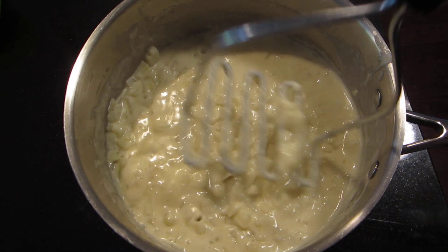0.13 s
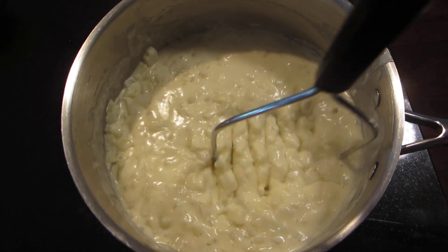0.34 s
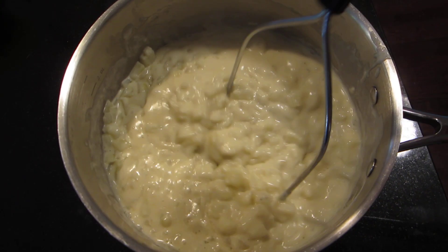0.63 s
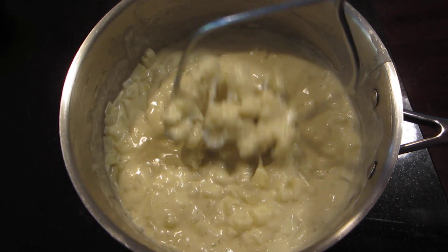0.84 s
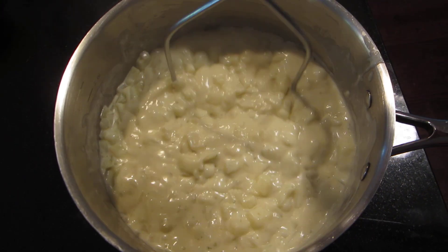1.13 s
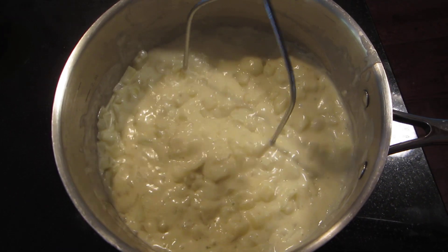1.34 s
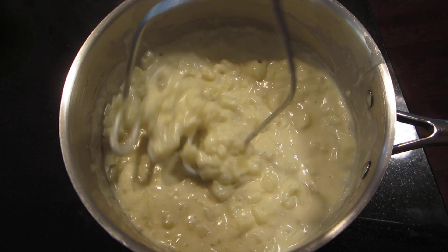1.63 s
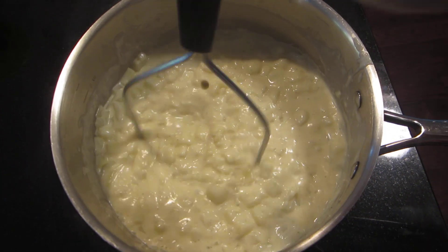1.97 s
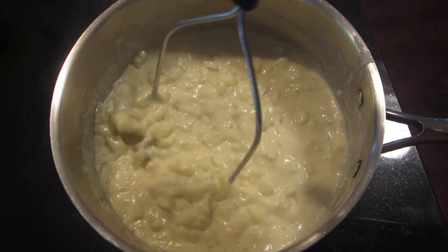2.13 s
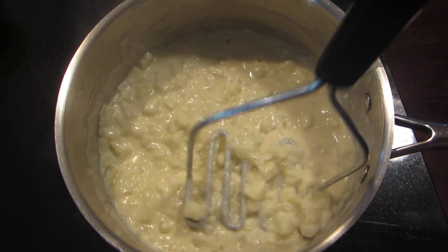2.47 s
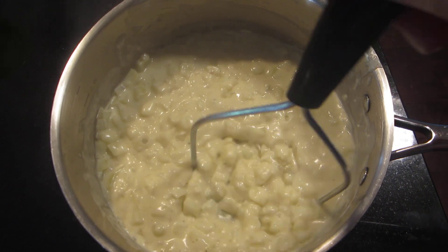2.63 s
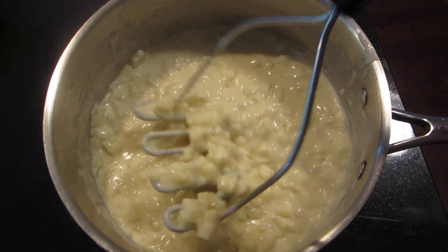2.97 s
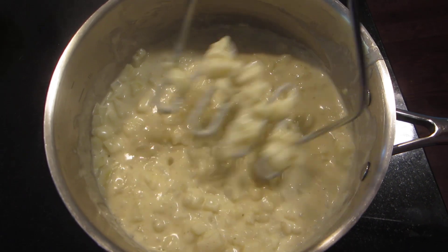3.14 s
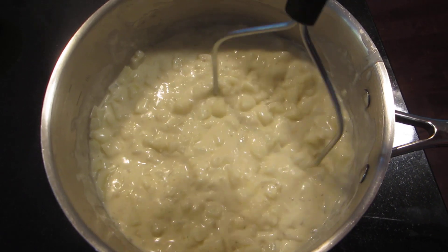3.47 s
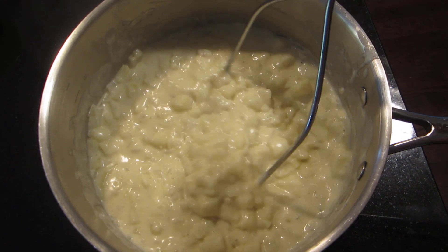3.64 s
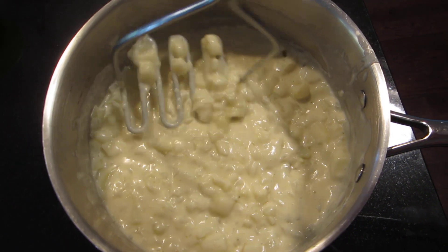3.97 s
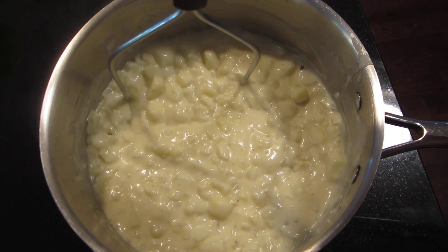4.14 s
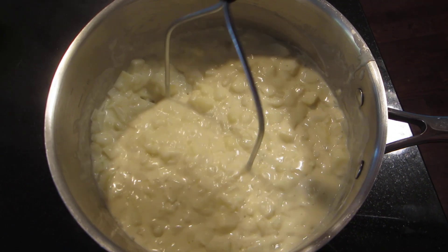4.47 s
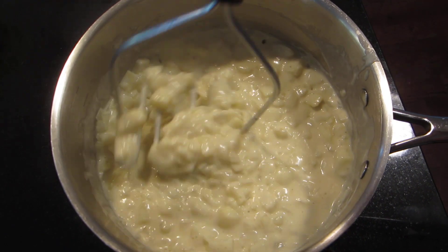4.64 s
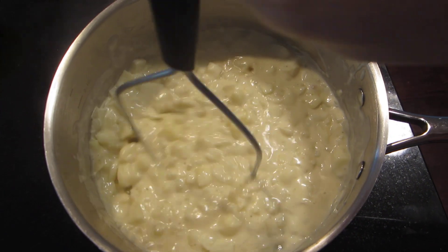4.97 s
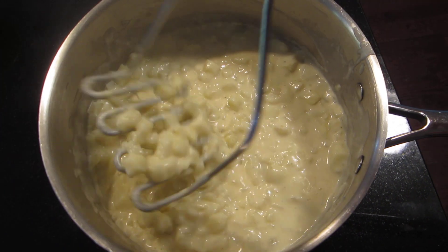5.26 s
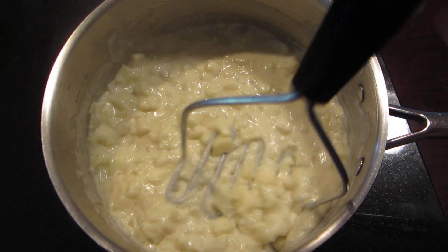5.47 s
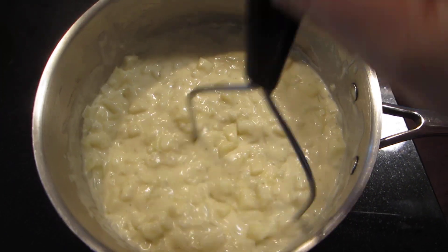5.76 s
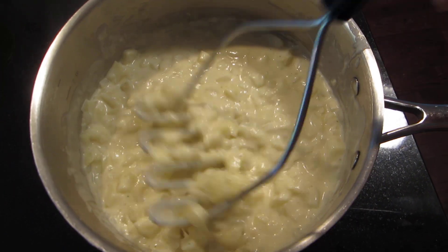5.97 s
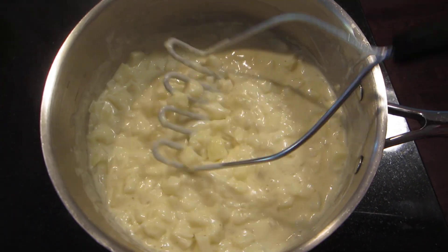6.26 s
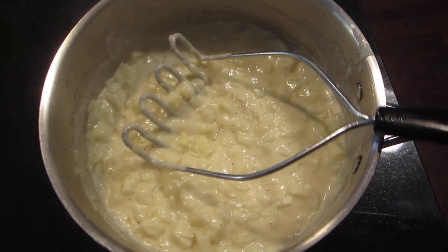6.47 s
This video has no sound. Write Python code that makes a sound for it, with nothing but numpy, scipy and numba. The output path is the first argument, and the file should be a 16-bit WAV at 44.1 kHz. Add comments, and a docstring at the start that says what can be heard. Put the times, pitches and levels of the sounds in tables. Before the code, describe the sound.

Irregular mashing heard from just over the pan rim: sharp wire-on-steel clanks, quick rasping drags, and clattering lighter contacts, with damp mash popping and plopping between. The pan rings briefly, squeaks once, and bumps the hob late on. Steady low hum and faint hiss lie underneath, dipping slightly after loud knocks and creeping back. The room is small, with little echo.

```python
"""Just above the rim of a steel saucepan, a wire masher is heard working thick potato soup.
The wire knocks and scrapes the steel: decaying modes ring under bursts and strokes of shaped noise.
The mash plops and ticks in short damped sines, the pan bumps the hob, and the wire squeaks once.
An appliance hums in steady lines over shaped noise for room air and microphone hiss.
The recorder turns its gain down on loud knocks and lets it creep back."""
import sys
import numpy as np
from scipy import signal
from scipy.fft import rfft, irfft
from scipy.io import wavfile
from scipy.ndimage import uniform_filter1d, map_coordinates
from numba import njit

SR = 44100
rng = np.random.default_rng(int(sys.argv[2]) if len(sys.argv) > 2 else 0)


def dump_mix(stems):
    """Bounce the given channels to the path in sys.argv[1] as a 16-bit WAV at rate SR."""
    frames = np.atleast_2d(stems).T  # one column per channel
    limited = np.clip(frames, -1, 1)  # hard clip at full scale
    pcm = np.round(limited * 32767).astype(np.int16)
    wavfile.write(sys.argv[1], SR, pcm)


def voltage_ratio(level):
    """Linear amplitude factor for a level in decibels (scalar or array-like)."""
    return 10 ** (np.asarray(level, float) / 20)


N = 291501
T = np.arange(N) / SR

# Hum lines of an appliance. Each row: frequency in Hz, level in dB.
HUM_LINES = [(59.3, -65.5), (118.6, -72.5), (237.2, -54), (296.5, -61.5), (415.1, -79), (1127, -67)]
# Spectrum of room air and microphone hiss. Each row: frequency in Hz, relative level in dB.
AIR_SPECTRUM = [(20, 0.5), (53, -7), (177, -1.5), (347, -6.5), (738, -1.5), (1200, -9), (1600, -15.5),
                (2050, -14.5), (2600, -21.5), (8890, -25.5), (12800, -30), (16000, -34)]
AIR_DB = -53
# Clear bubbles bursting on the mash. Each row: start in seconds, level in dB, frequency in Hz.
BUBBLES = [(.107, -29, 4250), (.179, -29.5, 5000), (.787, -34.5, 2450), (.821, -28.5, 5900),
           (.879, -37.5, 5800), (.979, -25, 6900), (1.044, -35, 3670), (1.414, -28, 4270),
           (1.451, -28.5, 3550), (1.484, -27.5, 4160), (1.601, -28, 9100), (1.619, -31, 4450),
           (1.634, -29, 5800), (1.649, -25.5, 8900), (1.666, -25.5, 7000), (1.682, -33.5, 2500),
           (1.848, -30, 5740), (2.067, -19.5, 6480), (2.161, -26, 9700), (2.24, -35.5, 2750),
           (2.311, -26.5, 5600), (2.34, -36, 5300), (2.357, -31, 4800), (2.653, -19.5, 2860),
           (2.96, -34, 4800), (3.051, -29.5, 4460), (3.109, -34.5, 3600), (3.678, -28, 10230),
           (3.735, -31.5, 2900), (3.763, -31, 11400), (3.782, -28.5, 5000), (3.918, -29.5, 7200),
           (4.453, -29.5, 3870), (4.55, -24, 6260), (4.721, -26.5, 3033), (4.74, -30, 3600),
           (5.323, -34.5, 2310), (5.397, -35, 6500), (5.516, -20.5, 3100), (5.677, -37, 2130)]
# Wire dragged over steel. Each row: start in seconds, loudest moment in seconds, end of the main
# stroke in seconds, level in dB, base level relative to the wire in dB (high when deep in the pan).
STROKES = [(0.19, 0.213, 0.35, -37.5, -3), (0.336, 0.338, 0.71, -49.5, -1.5),
           (0.46, 0.487, 0.5, -35.5, -25.5), (0.51, 0.528, 0.7, -49, 3), (0.542, 0.566, 0.59, -42.5, -9.5),
           (0.965, 0.984, 1.07, -57, 1.5), (1.148, 1.192, 1.205, -35, -14.5), (1.201, 1.205, 1.245, -40, 9),
           (1.225, 1.257, 1.285, -29, -7), (1.268, 1.272, 1.53, -44, -1), (1.775, 1.79, 1.9, -59, 13),
           (1.865, 1.931, 1.96, -46, -1), (1.94, 1.971, 1.99, -35, -1), (1.986, 1.99, 2.15, -45, -1),
           (2.075, 2.089, 2.1, -49.5, -12), (2.442, 2.453, 2.71, -33, -5), (2.625, 2.635, 2.7, -37, -13),
           (2.708, 2.72, 2.78, -48.5, 5), (2.769, 2.77, 2.92, -44, -16), (2.811, 2.84, 2.91, -41.5, -6),
           (3.208, 3.227, 3.45, -36.5, -4), (3.429, 3.467, 3.5, -38, -9), (3.512, 3.545, 3.66, -48, -7.5),
           (3.58, 3.592, 3.67, -45, 8), (4.036, 4.04, 4.24, -47, -7), (4.117, 4.145, 4.17, -49, -6),
           (4.191, 4.283, 4.335, -38, -13), (4.288, 4.298, 4.302, -21, -24), (4.334, 4.338, 4.57, -41.5, 0),
           (4.708, 4.747, 4.8, -50, -4), (4.787, 4.806, 4.86, -54, 5), (4.905, 4.945, 4.975, -40, -16),
           (4.948, 4.953, 5.0, -47, 9), (5.0, 5.013, 5.036, -51, 8), (5.452, 5.46, 5.68, -38, -3),
           (5.576, 5.586, 5.598, -20.5, -24), (5.722, 5.75, 5.9, -44, 9), (5.815, 5.855, 5.89, -39, -20),
           (6.262, 6.278, 6.43, -39.5, -4), (6.333, 6.347, 6.43, -44, -4), (6.527, 6.539, 6.65, -51.5, 7)]
# Spectrum of the wire's rasp. Each row: frequency in Hz, relative level in dB.
RASP_SPECTRUM = [(2500, -41.5), (4500, 1), (8000, 2), (11000, -19), (16000, -25)]
# Spectrum of the thinnest wire contact. Each row: frequency in Hz, relative level in dB.
SHEEN_SPECTRUM = [(6000, -14.5), (10000, -5), (13000, -17), (16000, -26.5)]
# Spectrum of the dense wall modes. Each row: frequency in Hz, relative level in dB.
WALL_SPECTRUM = [(700, -49), (1170, -4), (1550, -22), (2010, 4), (2500, -9), (3100, 4), (3800, -10),
                 (6000, -29.5)]
# Wire meeting steel. Each row: start in seconds, level in dB, treble relative to that level in dB,
# pan ring relative to that level in dB.
KNOCKS = [(0.195, -5, -6, -21), (0.3409, -9.5, 0.5, -70), (0.5187, -19.5, -5, -13),
          (0.5364, -19, -1.5, -12.5), (0.945, -41.5, -18, -12), (0.952, -32.5, -12.5, -5.5),
          (0.9614, -34.5, -3, -26), (0.97, -36, -3, -35), (0.9922, -31, 2, -17), (0.998, -38, -10, -25),
          (1.1441, -22.5, -5, -13), (1.2038, -20.5, -10, -12.5), (1.2618, -13, -7.5, -40),
          (1.695, -45, -12, 6.5), (1.7675, -24, -2, -11), (1.803, -51, -16, 11.5),
          (1.9697, -20, -14.5, -23), (1.9867, -16.5, -5.5, -18), (2.036, -26, 7, -43),
          (2.4276, -3, -2, -10.5), (2.543, -17, -9, -15), (2.7138, -16.5, -8.5, -7),
          (2.723, -31, -2.5, -24), (2.757, -40.5, -14, 11), (2.7738, -25, -3, -11),
          (2.901, -19.5, 0, -42.5), (3.2077, -3.5, -5, -12.5), (3.3482, -21, -0.5, -14.5),
          (3.4602, -24, -13.5, -9), (3.5125, -12.5, -2.5, -20), (3.586, -23, -13, -2.5),
          (3.5987, -30, -5, -12), (3.9918, -30.5, -11.5, -22), (4.036, -20, -1.5, -19.5),
          (4.1095, -34.5, 3, -11), (4.334, -8.5, -2, -27), (4.3418, -10, -3, -18), (4.468, -28.5, -14, -48),
          (4.788, -15, -2, -16.5), (4.806, -42, -17, 7), (4.834, -38, -13, 4.5), (4.849, -44.5, -10, 8),
          (4.95, -28, -9, -3.5), (5.4278, -29, -11.5, -46), (5.448, -8, -2.5, -17.5),
          (5.5658, -23, -7, -18), (5.7253, -30, -14, 7.5), (5.7371, -15, -11.5, -8.5),
          (5.7772, -17, -1.5, -17), (5.7848, -20.5, -10, -2), (6.2574, -10.5, 0.5, -16),
          (6.3524, -23, -4.5, -24), (6.5234, -33, -3.5, -1), (6.5306, -26.5, 0.5, -0.5)]
# Saucepan modes left to ring. Each row: frequency in Hz, level in dB, 60 dB decay time in seconds.
PAN_MODES = [(676, -26.5, 0.64), (750, -9.5, 0.49), (810, -13.5, 0.12), (952, -13, 0.34), (1079, -10, 0.1),
             (1119, -7, 0.31), (1212, -10.5, 0.34), (1380, -7, 0.16), (1550, -15.5, 0.33),
             (1873, -23.5, 0.46), (2077, 5, 0.2), (2583, -7.5, 0.14), (2860, -18.5, 0.069),
             (3090, -16.5, 0.15), (3340, -11.5, 0.12), (3590, -13, 0.26), (3826, -13, 0.23),
             (4050, -14, 0.073), (4600, -13, 0.24), (5140, -1.5, 0.1), (5750, -22.5, 0.12),
             (6500, -14, 0.19), (7130, -10.5, 0.12), (8080, -4, 0.15), (10400, -7.5, 0.036)]
# Spectrum of the knock's burst. Each row: frequency in Hz, relative level in dB.
CRACK_SPECTRUM = [(180, -58.5), (300, -22.5), (701, -9), (1320, -12.5), (1930, 1), (5250, 5), (8790, 1.5),
                  (9880, -1.5), (11300, -4), (13500, -10), (16000, -23.5)]
# Dull plops of pan base and mash. Each row: start in seconds, level in dB, starting frequency in Hz,
# 60 dB decay time in seconds.
PLOPS = [(0.29, -33.5, 596, 0.18), (0.59, -25, 725, 0.037), (1.078, -33, 705, 0.082),
         (1.333, -26, 758, 0.065), (1.85, -33.5, 744, 0.035), (1.694, -30.5, 707, 0.13),
         (1.804, -26, 1105, 0.026), (2.714, -12, 1120, 0.027), (2.823, -23, 647, 0.05),
         (3.532, -24.5, 638, 0.054), (3.556, -31, 714, 0.047), (3.586, -22.5, 753, 0.25),
         (3.598, -19.5, 737, 0.044), (4.212, -34, 575, 0.043), (4.75, -33, 723, 0.22),
         (5.176, -39, 700, 0.056), (5.514, -22, 676, 0.046), (5.724, -12.5, 584, 0.031),
         (5.74, 2.5, 723, 0.023), (5.754, -17, 684, 0.16), (5.792, -15.5, 701, 0.079),
         (6.522, -29.5, 658, 0.17)]
# The pan rocking on the hob. Each row: start in seconds, level in dB, frequency in Hz.
BUMPS = [(2.76, -40.5, 41), (5.765, -36, 40), (5.74, -26.5, 140), (2.714, -35.5, 137)]

# stroke level at its start; its fall from the loudest moment to the end
CATCH_DB, EASE_DB, EASE_DB_PER_S = -14, -10.5, -54.5
# a stroke trails away for a share of the time it spent easing off
TRAIL_SHARE, TRAIL_DB = 0.7, -14
# the wall sounds part of the way between wire and base, more so as a stroke gathers speed
WALL_DB, WALL_SHARE, WALL_SWELL_DB = -0.5, 0.75, 2
# a stroke that gathers speed is brighter than one that skids to rest
SHEEN_DB, SHEEN_SWELL_DB = 1, 17
# harder knocks bounce off and let the steel ring; softer ones stay pressed
BOUNCE_DB = -8.5
BASE_TOP_HZ, WALL_TOP_HZ = 1000, 4300
PRESSED_PITCH, PRESSED_DECAY = 0.975, 0.18  # ratios to the free mode
# the steel has close modes beyond counting; the moving wire wakes a few, then others
MOTTLE_HZ, MOTTLE_S, MOTTLE_DB = 150, 0.07, 5


def colour(x, points):
    """Linear filtering: a spectrum given in Hz and dB multiplies that of the sound."""
    hz, db = np.transpose(points)
    f = np.maximum(np.arange(len(x) // 2 + 1) * SR / len(x), 1)
    gain = voltage_ratio(np.interp(np.log(f), np.log(hz), db))
    return irfft(rfft(x) * gain, len(x))


def unit(x):
    """Normalisation: scales a signal to an rms of 1."""
    return x / np.sqrt(np.mean(x ** 2))


def ring(x, hz, t60):
    """Damped resonator: an impulse of 1 rings one mode with a starting amplitude of 1."""
    pole = np.exp((2j * np.pi * hz - np.log(1000) / t60) / SR)
    return signal.lfilter([1], [1, -pole], x).imag


def walk(rate):
    """Slow random modulation: normal levels drawn rate times a second, joined by ramps."""
    k = int(SR / rate)
    held = np.repeat(rng.standard_normal(N // k + 1), k)
    return uniform_filter1d(held, k)[:N]


def mottle(x):
    """Fluctuating modal excitation: narrow bands swell and fade at random, each briefly."""
    hz, s, z = signal.stft(x, SR, nperseg=512)
    chance = rng.standard_normal((128, 512))
    place = np.meshgrid(hz / MOTTLE_HZ, s / MOTTLE_S, indexing="ij")
    db = MOTTLE_DB * map_coordinates(chance, place, order=1, mode="mirror")
    return signal.istft(z * voltage_ratio(db), SR, nperseg=512)[1][:N]


def kitchen():
    """Superposition: hum lines that waver a little over room air and microphone hiss."""
    hum = 0
    for hz, db in HUM_LINES:
        hum = hum + voltage_ratio(db + 3 + 1.2 * walk(3)) * np.sin(2 * np.pi * hz * T + hz)
    return hum + voltage_ratio(AIR_DB) * unit(colour(rng.standard_normal(N), AIR_SPECTRUM))


def fizz(rate=170, db=-52, spread_db=15):
    """Heavily damped oscillation: each bursting bubble sounds a cycle or two, most of them faintly."""
    out = np.zeros(N + 256)
    t = np.arange(256) / SR
    chance = rng.random((int(rate * N / SR), 3))
    start = chance[:, 0] * N / SR
    level_db = db + spread_db * chance[:, 1] ** 3
    pitch_hz = 2500 * 5.5 ** chance[:, 2]
    faint = np.transpose([start, level_db, pitch_hz])
    for s, bubble_db, hz in np.vstack([BUBBLES, faint]):
        i = int(s * SR)
        out[i:i + 256] += voltage_ratio(bubble_db + 4.5) * np.sin(2 * np.pi * hz * t) * np.exp(-t * hz / 0.98)
    return out[:N]


def grit():
    """Rough friction: noise whose strength jumps as the wire catches on scratches, in patches."""
    catches_db = 3.6 * walk(350)
    patches_db = 1.8 * walk(45)
    return unit(rng.standard_normal(N) * voltage_ratio(catches_db + patches_db))


def drag(db):
    """Contact pressure: each stroke catches, swells to its loudest, eases off and lets go."""
    out = np.zeros(N)
    for (start, top, end, *_), level_db in zip(STROKES, db):
        gone = end + TRAIL_SHARE * (end - top) + 0.001
        i, j = int(start * SR), int(gone * SR)
        last_db = EASE_DB + EASE_DB_PER_S * (end - top)
        levels = [CATCH_DB, 0, last_db, last_db + TRAIL_DB]
        out[i:j] += voltage_ratio(level_db + np.interp(T[i:j], [start, top, end, gone], levels))
    # the contact lets go over a few milliseconds
    ease = np.exp(-1 / (0.00076 * SR))
    return signal.lfilter([1 - ease], [1, -ease], out)


def strokes():
    """Friction as a source: separate rough noises for wire, wall, base and thinnest contact."""
    start, top, end, db, deep_db = np.transpose(STROKES)
    swell = (top - start) / (end - start)  # share of the stroke spent gathering speed
    wall_db = db + WALL_DB + WALL_SHARE * deep_db + WALL_SWELL_DB * swell
    sheen_db = db + SHEEN_DB + SHEEN_SWELL_DB * swell
    return [grit() * drag(d) for d in (db, wall_db, db + deep_db, sheen_db)]


def scrape(rasp, wall, sheen):
    """High modal density: closely packed modes turn the strokes into mottled, coloured noise."""
    wire = voltage_ratio(4.5) * colour(rasp, RASP_SPECTRUM) + colour(sheen, SHEEN_SPECTRUM)
    return mottle(wire + voltage_ratio(10) * colour(wall, WALL_SPECTRUM))


def saucepan(rasp, wall, base):
    """Modal superposition: each knock strikes the modes in its own mix; scraping keeps them singing."""
    s, knock_db, treble_db, ring_db = np.transpose(KNOCKS)
    at = (s * SR).astype(int)
    spot = rng.standard_normal((len(s), len(PAN_MODES)))
    free = np.zeros(N)
    free[at] = knock_db > BOUNCE_DB
    wall_hz, wall_gain_db = np.transpose(WALL_SPECTRUM)
    out = np.zeros(N)
    for k, (hz, db, t60) in enumerate(PAN_MODES):
        zone = int(hz > BASE_TOP_HZ) + int(hz > WALL_TOP_HZ)  # 0 base, 1 wall, 2 treble
        share_db = treble_db - 10 if zone == 2 else ring_db
        blows = np.zeros(N)
        blows[at] = voltage_ratio(knock_db + share_db + 4 * spot[:, k])
        blows *= voltage_ratio(db - 5)
        out += ring(blows * free, hz, t60)
        # the pressing wire damps the steel, and feeds each mode more or less as it travels
        held_hz, held_t60 = hz * PRESSED_PITCH, t60 * PRESSED_DECAY
        wall_db = np.interp(np.log(held_hz), np.log(wall_hz), wall_gain_db)
        rub_db = (0.2 * db - 15, wall_db - 4, 0.2 * db - 13)[zone]
        rub = (base, wall, rasp)[zone] * voltage_ratio(rub_db + 3.5 * walk(12))
        rub /= np.sqrt(held_t60 * SR / (4 * np.log(1000)))  # offsets the build-up of a longer ring
        pressed = voltage_ratio(5.5) * blows * (1 - free)
        out += ring(rub + pressed, held_hz, held_t60)
    return out


def cracks():
    """Impact: each contact wakes many short high modes, heard as a bright, dying noise."""
    high, low = np.zeros(N), np.zeros(N)
    t_ms = np.arange(4096) / SR * 1000
    chance = unit(mottle(rng.standard_normal(N)))[:len(KNOCKS) * 4096].reshape(-1, 4096)
    for (s, knock_db, treble_db, _), noise in zip(KNOCKS, chance):
        i = int(s * SR)
        decay_ms = 0.46 * (2 - 0.51 * treble_db)  # duller knocks linger
        fade = np.exp(-t_ms / max(decay_ms, 0.1))
        fade += 0.24 * np.exp(-t_ms / max(4.5 * decay_ms, 0.1))
        burst = (noise * fade * np.minimum(t_ms / 0.3, 1))[:N - i]
        low[i:i + len(burst)] += voltage_ratio(knock_db) * burst
        high[i:i + len(burst)] += voltage_ratio(knock_db + treble_db) * burst
    body = signal.sosfilt(signal.butter(2, [1100, 4500], "band", fs=SR, output="sos"), low)
    edge = signal.sosfilt(signal.butter(2, 4500, "high", fs=SR, output="sos"), high)
    return colour(voltage_ratio(5) * body + voltage_ratio(11) * edge, CRACK_SPECTRUM)


def plops():
    """Damped oscillation: soft wet blows give a few rising cycles with a splatter of noise around."""
    out = np.zeros(N)
    t = np.arange(8192) / SR
    chance = rng.standard_normal((len(PLOPS), 8192))
    for (s, db, hz, t60), noise in zip(PLOPS, chance):
        i = int(s * SR)
        tone = np.sin(2 * np.pi * hz * t * (1 + 0.55 * t))
        splatter = 0.7 * unit(ring(noise, 1.125 * hz, 0.0043))
        fade = np.exp(-np.log(1000) * t / t60) * (1 - np.exp(-t / 0.001))
        out[i:i + len(t)] += voltage_ratio(db) * ((tone + splatter) * fade)[:N - i]
    return out


def bumps():
    """Structure-borne sound: the rocking pan sends low damped thumps through the hob."""
    out = 0
    for s, db, hz in BUMPS:
        t = np.maximum(T - s, 0)
        out = out + voltage_ratio(db) * np.sin(2 * np.pi * hz * t) * np.exp(-t * hz / 2)
    return out


def squeak():
    """Stick-slip in step with the base mode: an uneven tone swells, rises a little and breaks off."""
    peak_s, peak_hz, glide_hz_per_s = 4.757, 735, 150
    swell_db_per_s, stop_db_per_s = 380, 2500
    t = np.clip(T - peak_s, -0.1, 0.1)
    phase = 2 * np.pi * np.cumsum(peak_hz + glide_hz_per_s * np.minimum(t, 0)) / SR
    tone = np.sin(phase)
    tone += 0.12 * np.sin(2 * phase) + 0.03 * np.sin(4 * phase) + 0.04 * np.sin(6 * phase)
    db = np.minimum(swell_db_per_s * t, -stop_db_per_s * t) + 2.5 * walk(120)
    return tone * voltage_ratio(-25 + db) * (abs(t) < 0.1)


def room(x, t60=0.7, db=-25):
    """Reverberation: pan interior and walls add a short, diffuse, decaying tail."""
    t = np.arange(int(0.5 * SR)) / SR
    tail = signal.lfilter([1], [1, -0.4], rng.standard_normal(len(t))) * np.exp(-np.log(1000) * t / t60)
    return x + voltage_ratio(db) * signal.fftconvolve(x, tail / np.sqrt(np.sum(tail ** 2)))[:N]


def scene():
    """Superposition at the microphone of all sources, the near ones with the room's tail."""
    rasp, wall, base, sheen = strokes()
    steel = scrape(rasp, wall, sheen) + saucepan(rasp, wall, base) + cracks()
    near = fizz() + steel + plops() + squeak()
    # the near sounds carry nothing below about 430 Hz
    near = signal.sosfilt(signal.butter(4, 430, "high", fs=SR, output="sos"), near)
    return (room(near) + bumps() + kitchen())[None]


@njit
def ride(x, top, power, attack, release):
    """Gain control: an envelope follows the peaks, so gain drops fast and recovers slowly."""
    y, envelope = np.empty(len(x)), 0.
    for i in range(len(x)):
        a = abs(x[i])
        envelope += (a - envelope) * (attack if a > envelope else release)
        y[i] = x[i] * (min(1., top / (envelope + 1e-9)) ** power)
    return y


def low_pass(x):
    """Removes everything above the highest recorded frequency."""
    return signal.sosfilt(signal.butter(12, 17070, fs=SR, output="sos"), x)


def record(dry):
    """Recording chain: gain control, then a soft ceiling, then a band limit."""
    attack_s, release_s = 0.003, 0.45
    x = ride(dry[0], 0.07, 0.62, 1 / (attack_s * SR), 1 / (release_s * SR))
    x = 0.9 * np.tanh(x / 0.9)
    x = signal.sosfilt(signal.ellip(6, 0.3, 70, 15800, fs=SR, output="sos"), x)
    return low_pass(x[None])


dry = scene()
out = record(dry)
dump_mix(out)
```